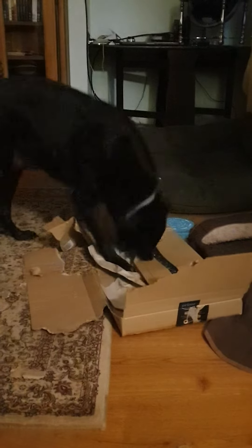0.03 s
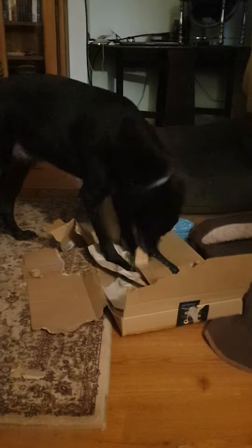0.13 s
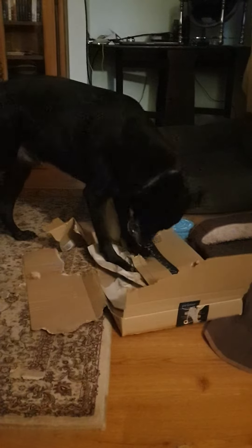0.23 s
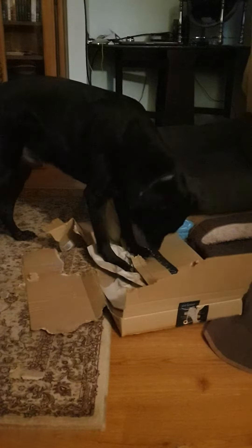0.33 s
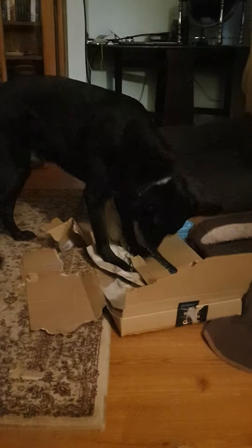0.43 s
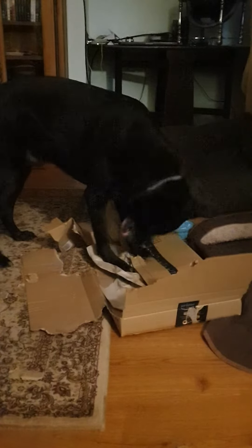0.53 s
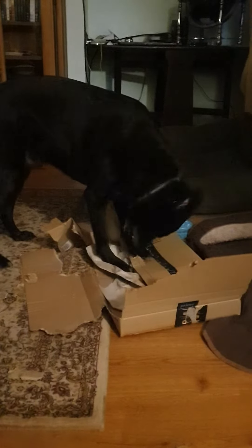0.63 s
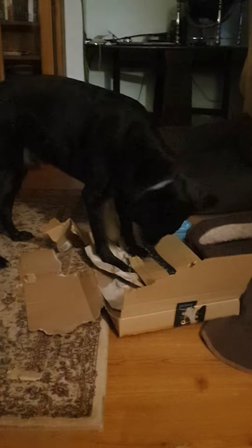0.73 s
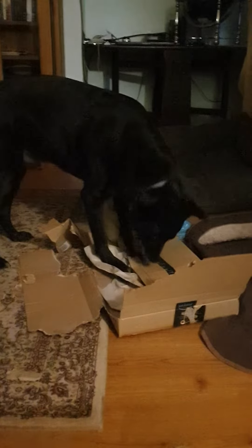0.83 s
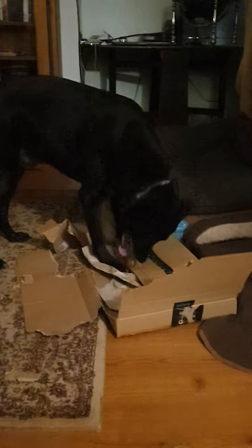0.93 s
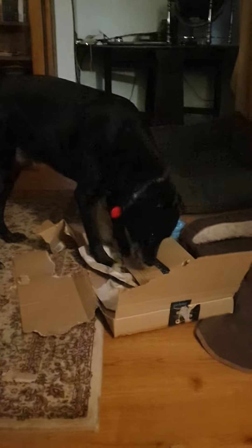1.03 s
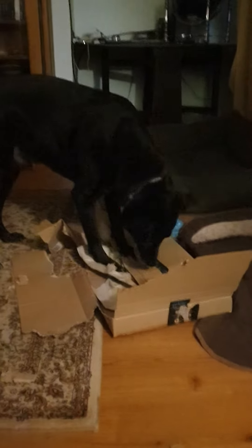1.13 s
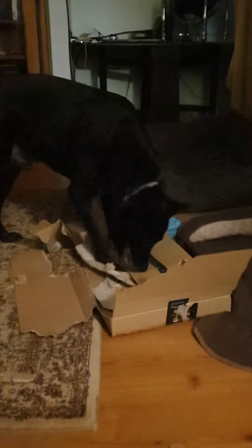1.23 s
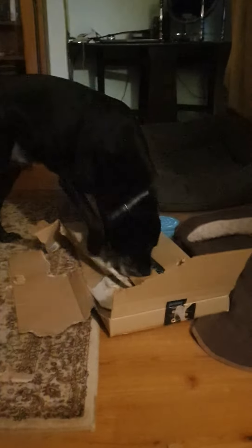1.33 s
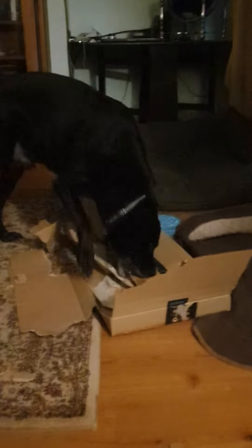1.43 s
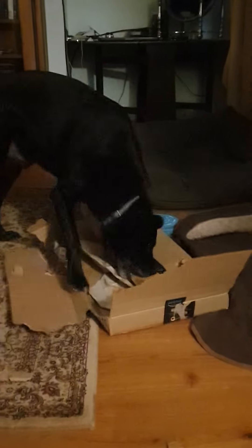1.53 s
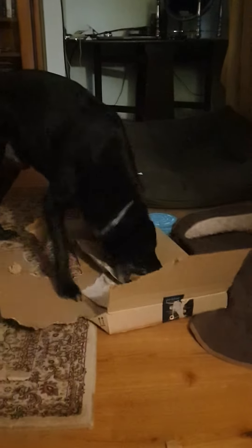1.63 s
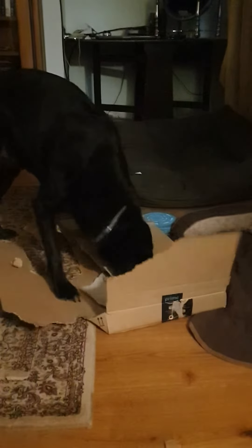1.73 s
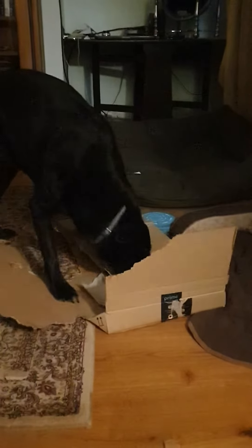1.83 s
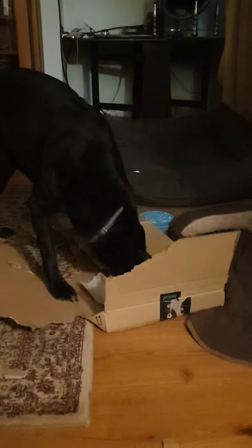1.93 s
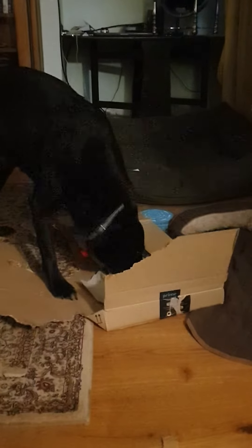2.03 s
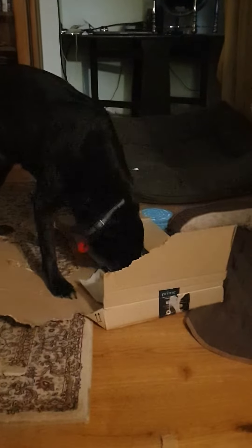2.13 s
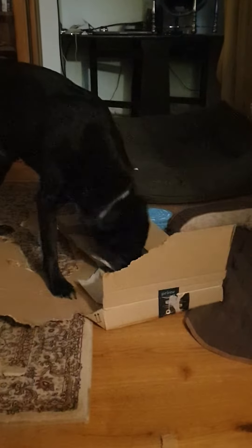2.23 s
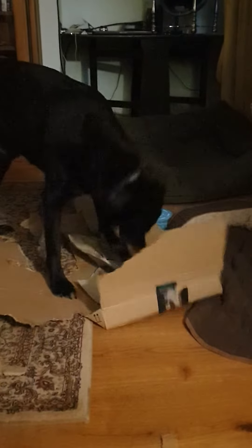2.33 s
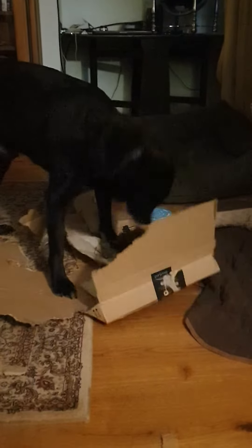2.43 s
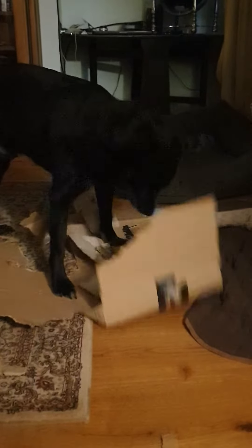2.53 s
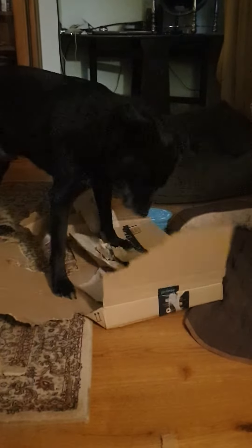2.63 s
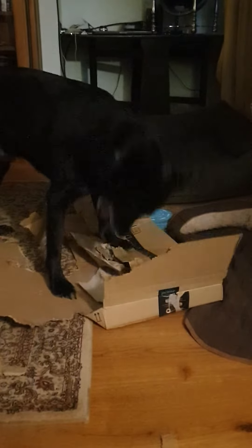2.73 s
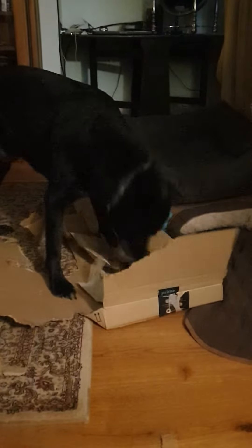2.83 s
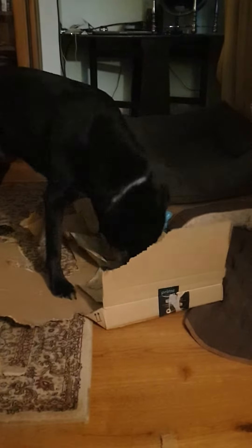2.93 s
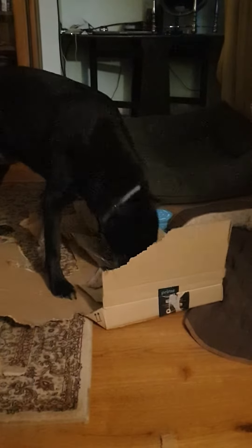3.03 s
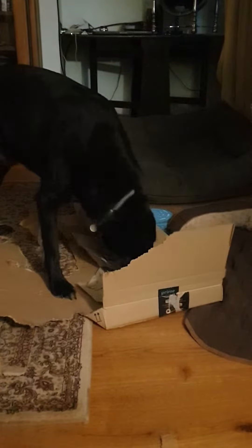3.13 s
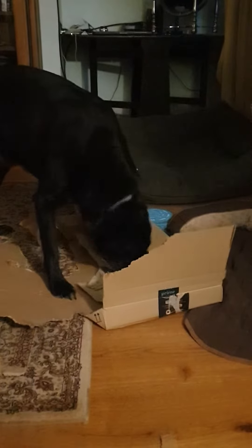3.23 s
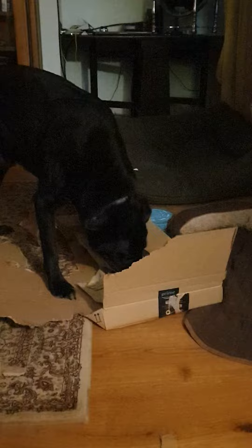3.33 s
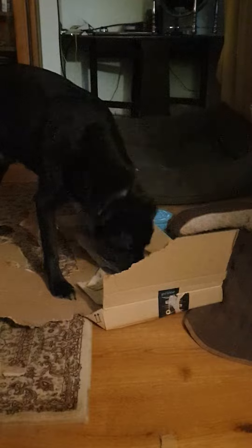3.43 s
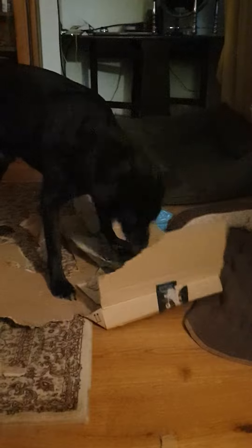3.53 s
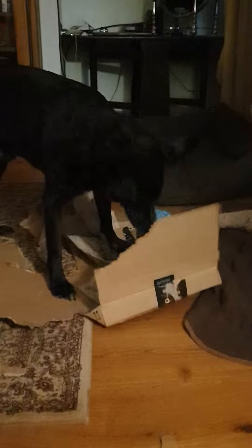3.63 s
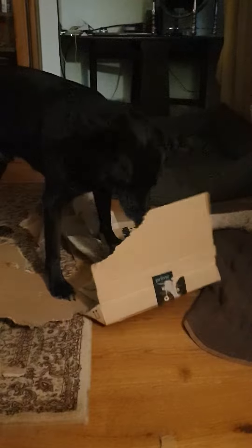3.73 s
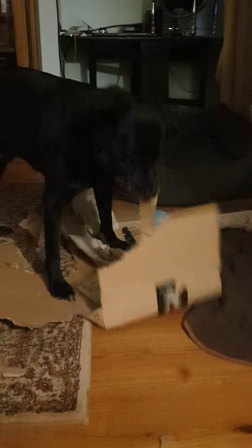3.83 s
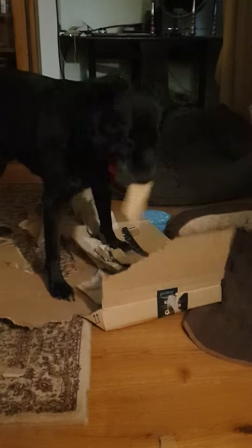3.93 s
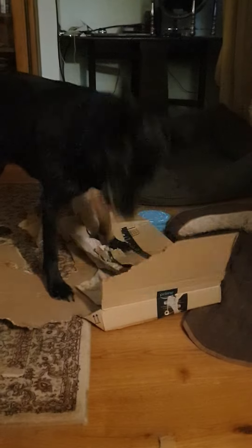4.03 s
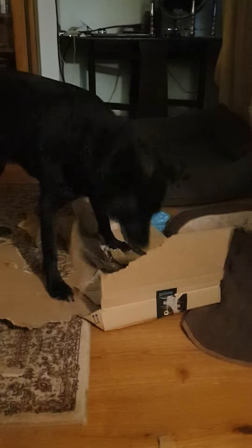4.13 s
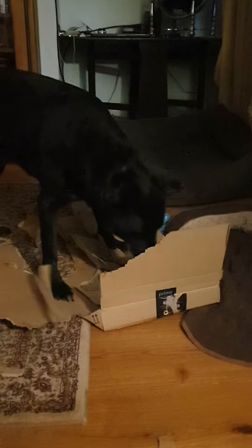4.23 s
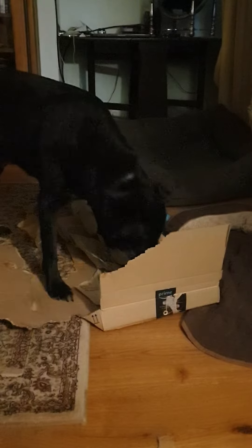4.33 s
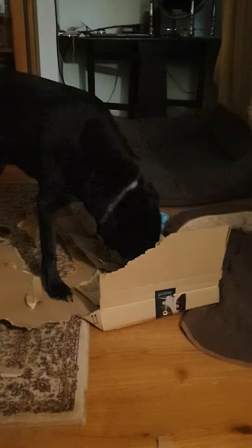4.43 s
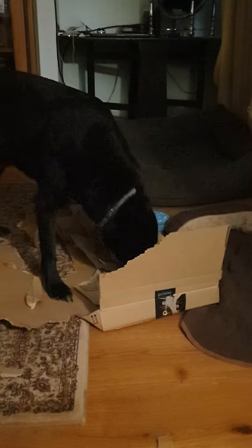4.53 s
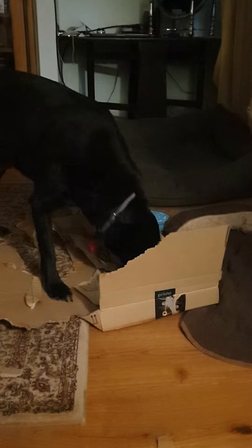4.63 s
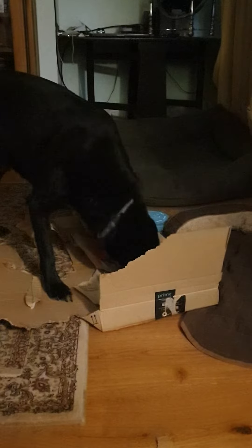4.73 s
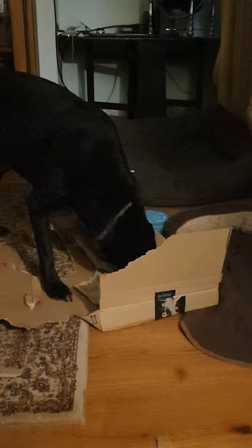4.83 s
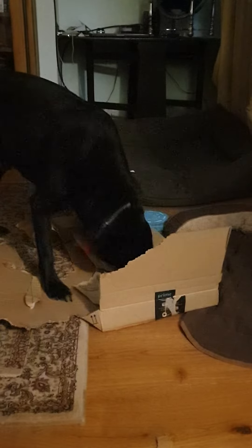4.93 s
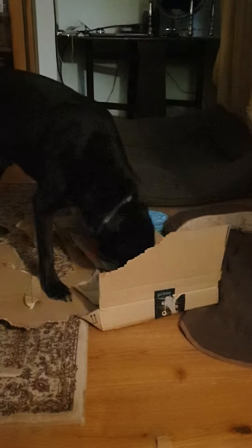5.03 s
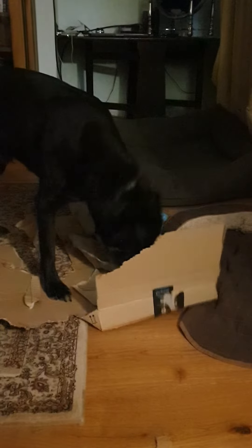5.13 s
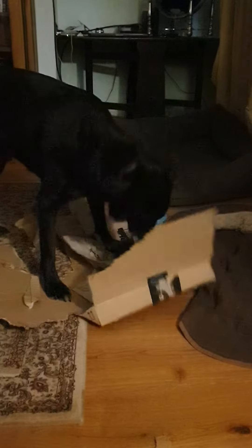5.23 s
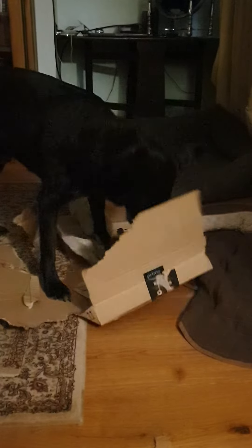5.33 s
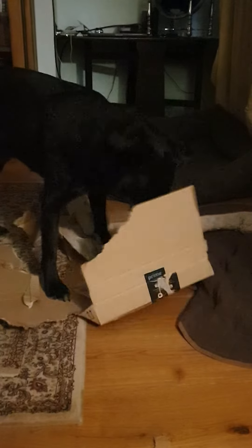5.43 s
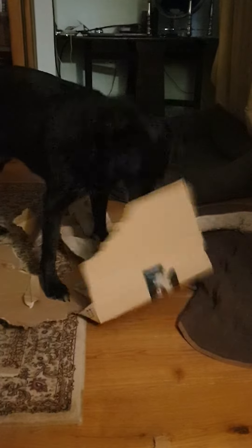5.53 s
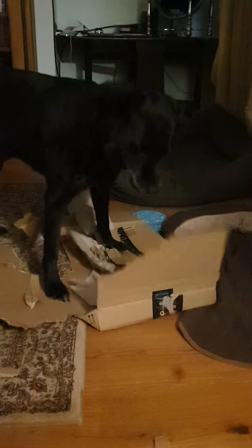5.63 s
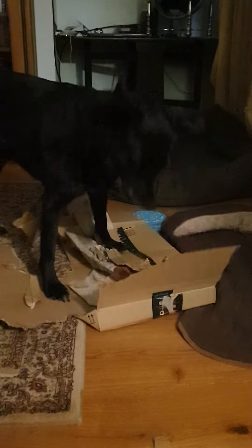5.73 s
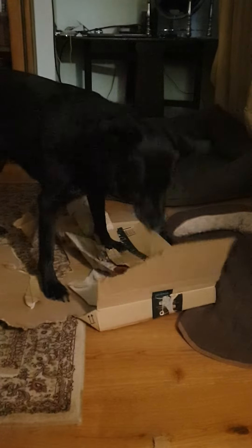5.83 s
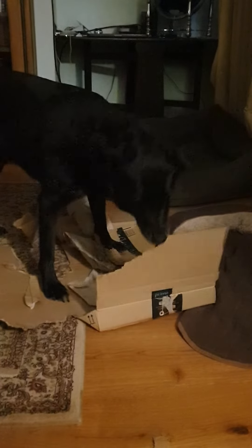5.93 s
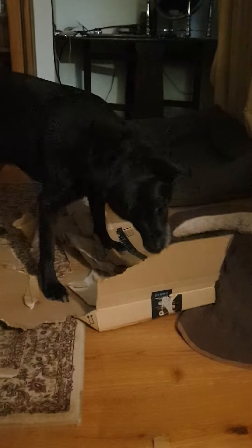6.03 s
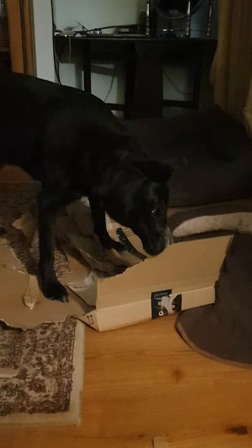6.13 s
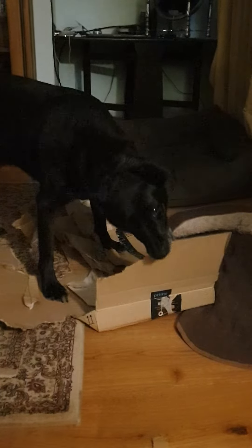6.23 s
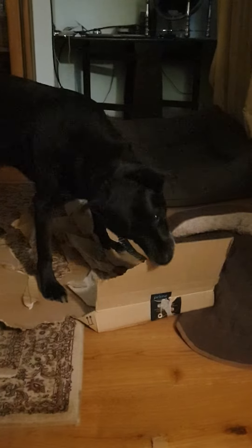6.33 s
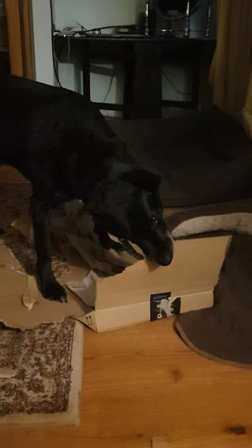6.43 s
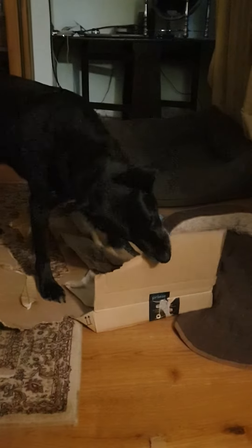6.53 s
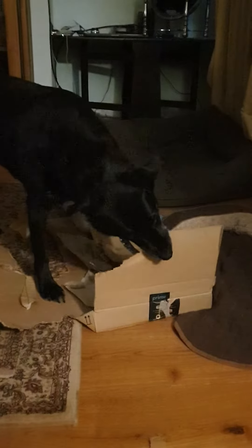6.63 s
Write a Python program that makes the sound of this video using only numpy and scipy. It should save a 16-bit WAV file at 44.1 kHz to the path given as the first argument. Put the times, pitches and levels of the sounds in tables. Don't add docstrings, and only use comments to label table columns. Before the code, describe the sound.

A dog tears and chews a cardboard box in violent bursts, with crackly rips, hollow thuds and quiet paper rustles between them indoors.

```python
import sys
import numpy as np
from scipy import signal
from scipy.fft import rfft, irfft, next_fast_len
from scipy.io import wavfile
from scipy.ndimage import uniform_filter1d

SR = 44100
rng = np.random.default_rng(int(sys.argv[2]) if len(sys.argv) > 2 else 0)


def attenuation_scalar(level_db):
    decades = np.asarray(level_db, float) / 20
    return 10 ** decades


def materialize(psi):
    bounded = np.clip(np.atleast_2d(psi).T, -1, 1)
    quanta = np.round(bounded * 32767).astype(np.int16)
    wavfile.write(sys.argv[1], SR, quanta)


N = 294147


def rms_one(x):
    return x / np.sqrt(np.mean(x ** 2) + 1e-30)


def at_hz(points, hz):
    point_hz, value = np.array(points).T
    return np.interp(np.log(hz + 1), np.log(point_hz), value)


def band(x, low_hz, high_hz, order=2):
    sos = signal.butter(order, [low_hz, high_hz], "band", fs=SR, output="sos")
    return signal.sosfilt(sos, x)


def resonate(x, hz, width_hz):
    r = np.exp(-np.pi * width_hz / SR)
    zeros = np.array([1, 0, -1]) * (1 - r * r) / 2
    poles = [1, -2 * r * np.cos(2 * np.pi * hz / SR), r * r]
    return signal.lfilter(zeros, poles, x)


def colour(x, gain_of_hz):
    size = next_fast_len(N)
    gain = gain_of_hz(np.fft.rfftfreq(size, 1 / SR))
    return irfft(rfft(x, size) * gain, size)[..., :N]


def evened(x, over_s):
    size = int(over_s * SR)
    power = uniform_filter1d(uniform_filter1d(x ** 2, size), size)
    return x / np.sqrt(power + 1e-20)


def drift(rate_hz):
    r = np.exp(-2 * np.pi * rate_hz / SR)
    noise = rng.standard_normal(N + SR)
    return rms_one(signal.lfilter([1], [1, -2 * r, r * r], noise)[SR:])


def grains(per_s, spread_db, clump_db, clump_hz):
    sizes = attenuation_scalar(spread_db * np.minimum(rng.exponential(1, N), 4)) * rng.choice([-1, 1], N)
    happens = rng.random(N) < per_s / SR
    return sizes * happens * attenuation_scalar(clump_db * drift(clump_hz)) + 1e-18


def strokes(rows, kind):
    sag_db_per_s = dict(box=58, rip=19.5, rustle=31.5)
    fall_db_per_s = dict(box=238, rip=276.5, rustle=195)
    swell_db = 29
    t, power = np.arange(0, N + 32, 32) / SR, 0
    for s, swell, hold, db, *shifts_db in rows:
        late = t - s
        rise = swell_db * np.minimum(late, 0) / max(swell, 1e-3)
        sag = sag_db_per_s[kind] * np.clip(late, 0, hold)
        fall = fall_db_per_s[kind] * np.maximum(late - hold, 0)
        shape = np.maximum(rise - sag - fall, -300)
        registers_db = db + np.array([0, *shifts_db])[:, None]
        power = power + attenuation_scalar(2 * (registers_db + shape))
    return np.array([np.interp(np.arange(N) / SR, t, p) for p in power])


def hush():
    # (frequency [Hz], density [dB per Hz])
    hush_spectrum = [(18, -61), (30, -14), (93, -7.5), (437, -7.5), (1250, -10), (1860, -26), (5900, -18),
                     (7270, -6.5), (9710, -23), (11100, -9.5), (16000, -27)]
    noise = colour(rng.standard_normal((2, N)), lambda hz: attenuation_scalar(at_hz(hush_spectrum, hz)))
    return attenuation_scalar(-76.5) * rms_one(noise)


def effort():
    # (time [s], hold [s], strength [dB], hollow boom [dB], creak [dB])
    sudden_tugs = [(0.0, 0.062, -27, -3, -1.5), (0.498, .15, -62, -6, -5.5), (0.693, .15, -79, -11.5, 12),
                   (1.521, 0.079, -45, -6, 3.5), (1.933, 0.07, -37.5, -4.5, -7.5),
                   (2.027, 0.12, -42.5, 1.5, -7.5), (2.9, 0.022, -51.5, -3.5, -2.5),
                   (2.138, 0.11, -32, -9, -2.5), (2.452, 0.18, -21, 2, -3.5), (2.833, 0.093, -56, -5, -0.5),
                   (3.074, 0.025, -56, -3, -2.5), (3.127, .05, -51.5, 2.5, -9.5),
                   (1.66, 0.054, -43, -1.5, -2), (1.872, .03, -47.5, -5, -4), (2.701, .05, -46.5, -3, 2),
                   (3.609, 0.36, -23.5, 2, -1), (3.797, 0.12, -26.5, 0.5, -1.5),
                   (4.046, 0.23, -60, -5, -5.5), (4.375, 0.065, -44, -4.5, -4.5),
                   (4.674, 0.051, -57, 2, -1.5), (4.76, 0.22, -40.5, 2, -4), (5.75, 0.066, -51, -3, -2),
                   (0.301, 0.12, -62, 4.5, -25), (5.01, 0.03, -45, -12.5, -5),
                   (5.046, 0.029, -26, -3.5, -7), (5.182, 0.056, -36.5, 7, 3), (5.467, 0.09, -37, 3, 2),
                   (5.569, 0.077, -23.5, 1.5, -1.5), (5.99, 0.084, -59, -0.5, -8),
                   (6.308, 0.053, -36, 2, -5)]
    # (peak time [s], swell [s], strength [dB], hollow boom [dB], creak [dB])
    slow_drags = [(0.156, 0.11, -21, -5.5, -2), (0.955, 0.44, -63, -10, 2.5), (1.049, 0.27, -68, 6.5, -0.5),
                  (1.348, 0.069, -41.5, -6, 0.5), (1.735, 0.062, -43.5, 0, -2),
                  (1.934, 0.2, -46.5, -13, -8), (2.333, 0.072, -31.5, 2, 0), (2.44, 0.23, -32, 2, -1.5),
                  (3.19, 0.06, -52, 0, -14), (3.318, 0.31, -46, -2.5, 0), (3.49, 0.2, -51, -4.5, 3),
                  (3.578, 0.088, -52, -1, 1.5), (4.724, 0.054, -45.5, 3, -6), (4.941, 0.38, -38, -7, -6),
                  (1.83, 0.16, -53.5, -8, 1), (0.86, 0.13, -63, -6, 1), (3.25, 0.11, -49.5, 1.5, -8),
                  (5.39, 0.18, -33, 4, -15), (6.14, 0.086, -73.5, -7, 7.5), (3.43, 0.058, -50.5, -10, -8),
                  (4.259, 0.037, -62, -0.5, -11.5), (5.165, 0.13, -44.5, -3, 2), (5.306, 0.082, -35, 10, 3),
                  (5.445, 0.39, -27, 1, -4), (5.939, 0.11, -46, -2, -10), (6.27, 0.42, -73, 0, 2),
                  (6.595, 0.38, -42, -3.5, -2.5), (6.645, 0.017, -47, 10, 3.5)]
    tug_attack_s, drag_hold_s, boom_lag_s = 0.011, 0.018, 0.01
    tugs = [(s, tug_attack_s, hold, *levels) for s, hold, *levels in sudden_tugs]
    drags = [(s, swell, drag_hold_s, *levels) for s, swell, *levels in slow_drags]
    panel, boom, creak = np.sqrt(strokes(tugs + drags, "box"))
    t = np.arange(N) / SR
    return panel, np.interp(t - boom_lag_s, t, boom), creak


def box():
    # (frequency [Hz], width [Hz], level [dB])
    box_modes = [(58, 21, 2.5), (114.3, 16, 7.5), (157.8, 45, 1), (230, 20.5, 12.5), (309.3, 104, -2.5),
                 (407.6, 20, 0.5), (473, 59, -2.5), (564, 69, -0.5), (628.4, 44, -2), (753, 52, -1),
                 (840, 63, 2.5), (915, 110, 7), (1050, 330, -1.5), (1235, 90, 0.5), (1390, 870, -10),
                 (1700, 200, -5.5), (2090, 510, -10.5)]
    flex_db, flex_hz = 3.0, 6.6
    slips = grains(per_s=500, spread_db=1.5, clump_db=1.0, clump_hz=60.2)
    rung, sign = 0, 1
    for hz, width_hz, db in box_modes:
        gain = attenuation_scalar(db + flex_db * drift(flex_hz))
        rung = rung + sign * gain * resonate(slips, hz, width_hz)
        sign = -sign
    panel, boom, creak = effort()
    hollow_sound = boom * evened(band(rung, 48, 244), 0.055)
    panel_sound = panel * evened(band(rung, 277, 706), 0.042)
    crease_sound = creak * evened(band(rung, 927, 2010), 0.11)
    return hollow_sound + panel_sound + crease_sound


def tearing():
    # (time [s], swell [s], hold [s], rip [dB], fine hiss [dB])
    rips = [(0.0, .01, 0.0072, -35.5, -6), (0.05, 0.048, 0.073, -37.5, -1.5),
            (0.17, 0.16, 0.0027, -31, -0.5), (0.29, .05, 0.11, -70, -13), (2.13, 0.016, 0.09, -38, -2),
            (2.329, 0.16, 0.024, -40.5, 3), (2.519, 0.19, 0.0045, -24.5, -2),
            (2.6, 0.09, 0.033, -35.5, -6.5), (3.601, 0.0044, 0.12, -31, 1), (3.78, 0.072, 0.072, -32, 1),
            (3.91, 0.075, 0.067, -46.5, -5.5), (5.046, 0.0038, 0.013, -36.5, -4),
            (5.068, 0.049, 0.0023, -33.5, 1), (5.182, 0.0023, 0.1, -38, -0.5), (5.35, 0.36, 0.13, -37, 2),
            (5.545, 0.017, 0.04, -41.5, 7.5), (5.57, 0.02, 0.075, -35.5, -4.5),
            (5.66, .1, 0.098, -53, -32.5), (6.308, .003, 0.0034, -60.5, -3), (3.57, 0.12, 0.06, -58, 1.5)]
    # (time [s], swell [s], hold [s], rustle [dB], fine hiss [dB])
    rustles = [(0.5, 0.0027, 0.031, -61.5, -22.5), (0.552, 0.0025, .015, -67, -15.5),
               (0.586, 0.0044, 0.045, -65, -0.5), (0.61, 0.087, 0.016, -72, 13.5),
               (0.682, 0.0033, 0.043, -60, -27), (0.736, 0.0024, 0.03, -53.5, -4.5),
               (0.8, 0.044, .18, -55, -3.5), (1.13, 0.37, 0.005, -63, -2), (1.324, 0.062, 0.069, -51.5, -4),
               (1.53, 0.027, 0.1, -51, -0.5), (1.665, 0.027, 0.19, -54.5, -2),
               (1.934, 0.062, 0.2, -51, -0.5), (2.7, .1, 0.082, -57.5, -13),
               (2.838, .003, 0.027, -60.5, -17), (2.896, 0.0034, 0.02, -59, 0.5),
               (2.996, 0.0035, 0.15, -66, 7), (3.316, 0.22, 0.0051, -53.5, 1),
               (3.47, 0.13, 0.018, -56.5, 0.5), (4.08, .05, 0.042, -67.5, 1), (4.35, 0.062, 0.011, -70, 10),
               (4.367, 0.0028, 0.021, -58, 6), (4.79, 0.18, 0.0061, -54, 2.5),
               (4.922, 0.24, 0.062, -50.5, -1.5), (5.168, 0.038, 0.0074, -47, -3),
               (5.78, .05, 0.034, -64, -5), (5.922, 0.012, 0.069, -73, 12), (6.2, 0.43, 0.11, -67.5, -4),
               (6.31, 0.0033, 0.18, -50, 0.5), (6.6, 0.22, 0.011, -48.5, -2), (6.656, .01, .02, -43, -3)]
    # (frequency [Hz], density [dB per Hz])
    fibre_spectrum = [(1410, 2.5), (2400, 1), (2540, 0.5), (3040, 4.5), (3670, 3), (4870, 1), (5880, -5),
                      (6990, -5), (8780, -20), (11800, -18), (14900, -21.5), (15700, -38)]
    fine = rms_one(grains(per_s=9200, spread_db=2.5, clump_db=2.0, clump_hz=61.0))
    coarse = rms_one(grains(per_s=290, spread_db=-1.0, clump_db=4.5, clump_hz=32.1))
    snaps = fine + attenuation_scalar(-10.5) * signal.lfilter([.6], [1, -.4], coarse)
    snaps = colour(snaps, lambda hz: attenuation_scalar(at_hz(fibre_spectrum, np.minimum(hz, 14800))))
    rip, hiss = np.sqrt(strokes(rips, "rip") + strokes(rustles, "rustle"))
    rip_sound = rip * evened(band(snaps, 2000, 8380, order=3), 0.059)
    hiss_sound = hiss * evened(band(snaps, 8580, 17000, order=3), 0.32)
    return rip_sound + hiss_sound


def contacts():
    # (time [s], peak [dB], ring [Hz], slap [dB])
    bites = [(0.119, -18.5, 545, -12), (0.148, -8, 379, -6.5), (0.481, -55.5, 564, -14),
             (1.319, -52.5, 566, 4.5), (4.319, -55.5, 828, -25.5), (1.521, -25, 570, 0),
             (1.666, -33, 510, 2), (1.727, -20.5, 490, -7.5), (1.884, -33.5, 598, -3),
             (1.927, -38, 510, -4), (2.139, -17.5, 513, -5), (2.427, -22.5, 480, 1), (2.455, -25, 480, -10),
             (2.547, -14, 497, -18), (3.281, -38, 628, -29), (3.485, -39.5, 500, -4),
             (4.368, -24.5, 712, -9), (4.763, -30.5, 303, -10), (4.886, -34.5, 426, 6),
             (5.045, -22.5, 572, 3.5), (5.057, -13.5, 523, -1), (5.183, -18, 520, -28),
             (5.567, -11, 532, -2)]
    # (time [s], peak [dB], ring [Hz], slap [dB])
    thuds = [(0.041, -52, 360, 5.5), (0.329, -70, 396, -11), (1.026, -61.5, 827, -18),
             (1.941, -34.5, 347, -20), (2.04, -37, 514, -4), (2.517, -39.5, 428, 9),
             (3.122, -44.5, 414, -2.5), (3.796, -22.5, 1050, 2), (3.909, -33.5, 626, 5),
             (3.979, -40, 627, -22), (4.716, -37.5, 602, -37), (5.242, -22.5, 460, -17),
             (5.639, -20.5, 595, 1), (6.309, -22, 260, 4.5), (6.416, -30, 1130, -31),
             (6.651, -48, 200, -13)]
    # (time [s], peak [dB], ring [Hz], crack [dB])
    fold_snaps = [(0.327, -51, 2180, -39), (0.501, -41, 2620, -11.5), (0.509, -40.5, 2090, -19),
                  (0.554, -45.5, 1720, -13), (0.685, -53, 2400, -10), (0.738, -36, 4860, 0),
                  (0.705, -61, 946, -18), (0.831, -44, 1420, -17), (0.97, -47.5, 920, -4),
                  (1.092, -46.5, 5450, -18), (1.114, -43.5, 5400, -8), (1.281, -50, 3820, -3),
                  (2.127, -31, 1180, 1), (2.489, -20, 840, 8), (2.614, -14.5, 920, -20),
                  (2.724, -31, 2130, -13), (2.776, -30.5, 1980, -27), (2.788, -36.5, 1130, -17),
                  (2.839, -31.5, 1700, -8), (2.898, -41.5, 830, 11.5), (2.997, -48.5, 3800, 3),
                  (3.603, -23, 1380, -15), (4.078, -34, 940, -11), (5.313, -29.5, 980, 4),
                  (5.915, -35.5, 900, -35), (6.134, -40.5, 920, -17), (6.481, -31.5, 1190, -5)]
    # (time [s], peak [dB], ring [Hz], slap [dB])
    jolts = [(1.683, -27, 203, -20), (2.321, -25.5, 223, -8), (2.458, -14, 226, -15), (2.481, -19, 230, -2),
             (2.503, -15.5, 200, 1), (3.605, -17.5, 227, -14.5), (3.659, -22, 570, -11),
             (3.683, -17, 237, -10.5), (3.798, -21.5, 230, -14.5), (3.85, -20.5, 240, -18.5),
             (4.722, -38, 130, -20), (5.244, -20, 200, -6), (5.289, -30, 208, -15.5),
             (5.388, -21, 245, -17), (5.419, -20.5, 234, -17), (5.456, -30.5, 280, -12),
             (5.49, -26, 910, 7.5), (5.57, -16, 202, 6), (6.564, -37.5, 199, -13)]
    # (time [s], peak [dB], ring [Hz], crack [dB])
    catches = [(0.586, -45, 5060, -15), (0.701, -52, 2360, -20), (0.861, -43.5, 1500, -18),
               (0.877, -46, 1400, -13), (1.301, -44, 1770, -8), (2.081, -37, 516, -18),
               (2.594, -18.5, 1940, -15), (3.08, -49.5, 970, -22), (3.148, -43.5, 915, -20),
               (3.185, -55, 581, -20), (3.213, -47, 501, -20), (3.314, -39, 815, -20),
               (3.424, -49, 538, -20), (3.46, -42, 960, -15), (3.543, -44, 1600, -15),
               (4.669, -50, 900, -21), (4.692, -46, 577, -23), (4.837, -39, 517, -18),
               (4.915, -30, 403, -20), (4.95, -34, 445, -20), (5.005, -45, 466, -20),
               (5.544, -33, 895, -10), (5.75, -42, 1060, 0.5), (5.787, -41, 1600, -17),
               (5.799, -43, 3500, -18), (5.85, -50.5, 1070, -25), (5.879, -50, 1090, -20),
               (5.913, -44, 1700, -28), (5.95, -46, 580, -18), (6.095, -50, 750, -24),
               (6.294, -43, 298, -40), (6.553, -35, 1320, -10), (6.598, -35.5, 720, -6),
               (6.655, -40, 4650, -4)]
    # (time [s], peak [dB], ring [Hz])
    fibre_snaps = [(0.0403, -21, 1870), (0.1186, -29.5, 1200), (0.1186, -24, 2250), (0.1471, -21, 1540),
                   (0.17, -25, 1330), (2.3213, -32.5, 1370), (2.3372, -26, 1410), (2.4265, -32, 1270),
                   (2.456, -18, 1520), (2.4635, -14.5, 1600), (2.4894, -19.5, 1260), (2.5168, -17, 1260),
                   (2.5897, -26, 1860), (2.6016, -31, 2040), (3.6044, -21, 1480), (3.6248, -23, 2040),
                   (3.6592, -21, 1870), (3.7835, -40, 3330), (3.7944, -20.5, 1240), (3.9112, -23.5, 1820),
                   (5.2412, -28, 1250), (5.3146, -21, 2030), (5.4318, -25, 1260), (5.4493, -21, 1850),
                   (5.544, -28, 1410), (5.5675, -29, 1190), (5.5675, -26, 1370), (5.6164, -40, 1320),
                   (5.6358, -20.5, 1870)]
    return ([(s, db, hz, -31, slap_db, -18.5) for s, db, hz, slap_db in bites]
            + [(s, db, hz, -11, slap_db, -8.5) for s, db, hz, slap_db in thuds]
            + [(s, db, hz, -36.5, -14.5, crack_db) for s, db, hz, crack_db in fold_snaps]
            + [(s, db, hz, -11, slap_db, -6) for s, db, hz, slap_db in jolts]
            + [(s, db, hz, -31, -18, crack_db) for s, db, hz, crack_db in catches]
            + [(s, db, hz, -36.5, -7.5, -1) for s, db, hz in fibre_snaps])


def knocks():
    out, t = np.zeros(N + SR), np.arange(SR // 8) / SR
    thump = np.sin(2 * np.pi * 108 * t) * np.exp(-t / 0.036)
    for s, db, hz, thump_db, slap_db, crack_db in contacts():
        noise = rng.standard_normal(len(t))
        scuff = 0.22 * noise * np.exp(-t / 0.0018)
        rebounds = 0.011 * noise ** 3 * np.exp(-t / 0.041) * (t > .004)
        touch = (t == 0) + scuff + rebounds
        width_hz = 110 + 0.24 * hz
        ring = resonate(resonate(touch, hz, width_hz), hz, width_hz)
        ring = band(ring, 0.14 * hz, 3.6 * hz)
        slap = band(touch, 800, 1570, order=3)
        crack = band(touch, 2100, 6800, order=3)
        hit = ring / np.abs(ring).max()
        hit = hit + attenuation_scalar(slap_db - 1.0) * slap / np.abs(slap).max()
        hit = hit + attenuation_scalar(thump_db + 2.0) * thump
        hit = hit + attenuation_scalar(crack_db + 2.5) * crack / np.abs(crack).max()
        at = round(s * SR)
        out[at:at + len(t)] += attenuation_scalar(db - 1.5) * hit
    return out[:N]


def collar():
    # (time [s], peak [dB])
    clinks = [
        (2.9705, -64),
        (4.0387, -68.5),
        (4.0826, -62.5),
        (4.3111, -77),
        (4.35, -76),
        (5.8217, -79),
        (5.9226, -64),
    ]
    # (frequency [Hz], T60 [s])
    tag_modes = [(11300, 0.069), (11480, 0.096)]
    taps, out = np.full(N, 1e-18), 0
    for s, db in clinks:
        taps[round(s * SR)] = attenuation_scalar(db + 8.0)
    for hz, t60 in tag_modes:
        r, w = attenuation_scalar(-60 / (t60 * SR)), 2 * np.pi * hz / SR
        out = out + signal.lfilter([0, np.sin(w)], [1, -2 * r * np.cos(w), r * r], taps)
    return out


def room(x, count=12):
    # (frequency [Hz], T60 [s])
    room_t60 = [(60, 0.3), (500, 0.17), (3000, 0.1), (12000, 0.24)]
    t, edges = np.arange(SR // 2) / SR, 30 * 2 ** np.arange(0, 9.6)
    tails, noise = 0, rng.standard_normal((count, 2, len(t)))
    for low, high in zip(edges, np.append(edges[1:], .45 * SR)):
        t60 = at_hz(room_t60, np.sqrt(low * high))
        decay = attenuation_scalar(-60 * t / t60) * np.minimum(t / 0.0026, 1)
        tails = tails + band(noise, low, high) * decay / np.sqrt(np.sum(decay ** 2))
    spot_s = .045
    place = (np.arange(N) / SR / spot_s - np.arange(count)[:, None]) % count - 1
    fades = np.cos(np.pi / 2 * np.clip(place, -1, 1))
    mid, side = signal.fftconvolve((x * fades)[:, None], tails, axes=2).sum(axis=0)[:, :N]
    share = attenuation_scalar(0.2)
    return np.array([(x + share * mid) / np.sqrt(1 + share ** 2), side])


def scene():
    # (frequency [Hz], side minus mid [dB])
    width = [(60, -25.5), (180, -9), (550, -0.5), (1650, 4.5), (4970, 3.5), (15000, 1.5)]
    # (frequency [Hz], left minus right [dB])
    lean = [(60, 1.5), (180, 1), (550, 1.5), (1650, 0), (4970, 1), (15000, 6)]
    wet = attenuation_scalar(-1.5)
    steady, contact = box() + tearing(), knocks()
    mid, side = room(steady + wet * contact + collar()) + hush()
    mid = mid + (1 - wet) * contact
    side = colour(side, lambda hz: attenuation_scalar(at_hz(width, hz)))
    left = colour(mid + side, lambda hz: attenuation_scalar(at_hz(lean, hz) / 2))
    right = colour(mid - side, lambda hz: attenuation_scalar(-at_hz(lean, hz) / 2))
    return np.array([left, right])


def roll_off(x):
    return signal.sosfilt(signal.butter(12, 16650, fs=SR, output="sos"), x)


def record(dry):
    low_pass = signal.ellip(10, .5, 60, 15880, fs=SR, output="sos")
    cut = signal.sosfilt(low_pass, dry)
    return roll_off(cut)


dry = scene()
out = record(dry)
materialize(out)
```